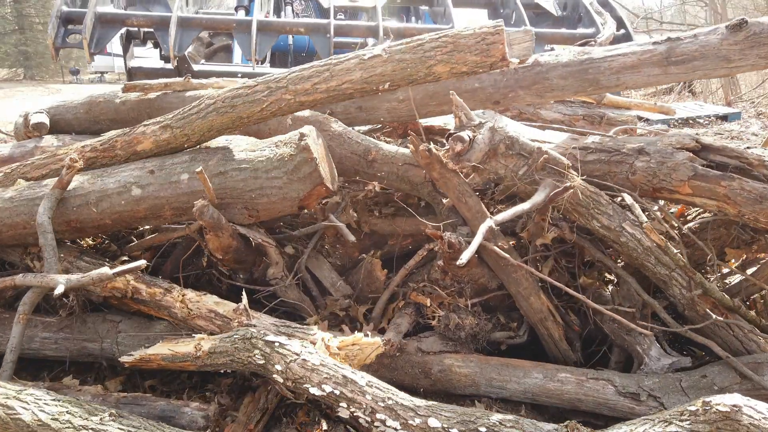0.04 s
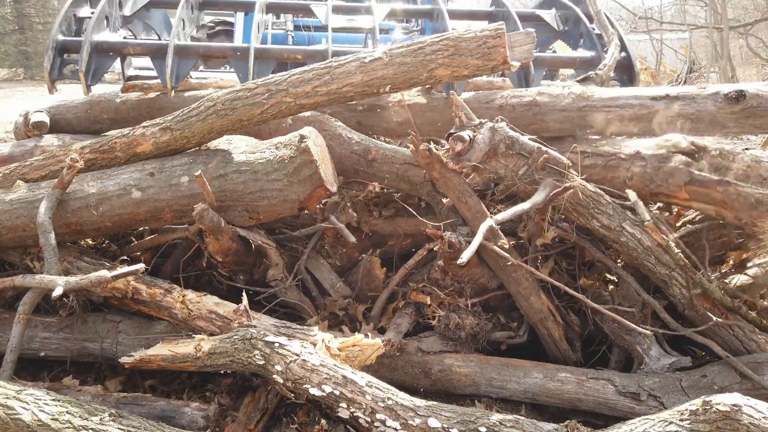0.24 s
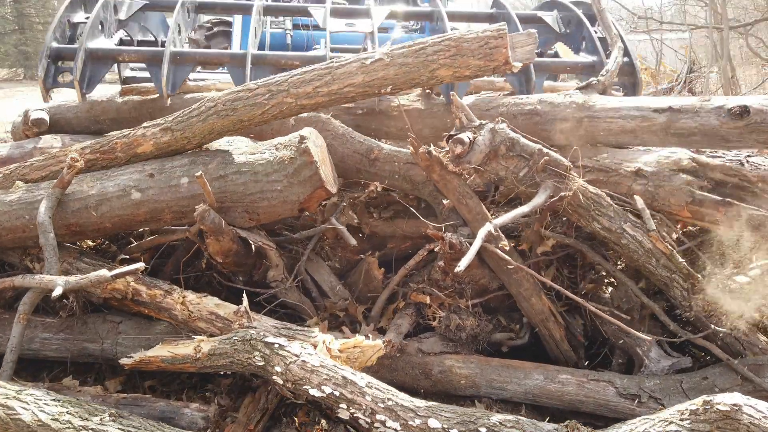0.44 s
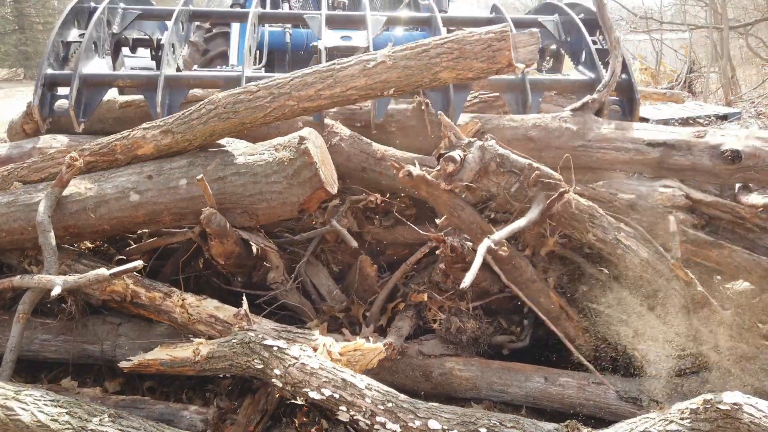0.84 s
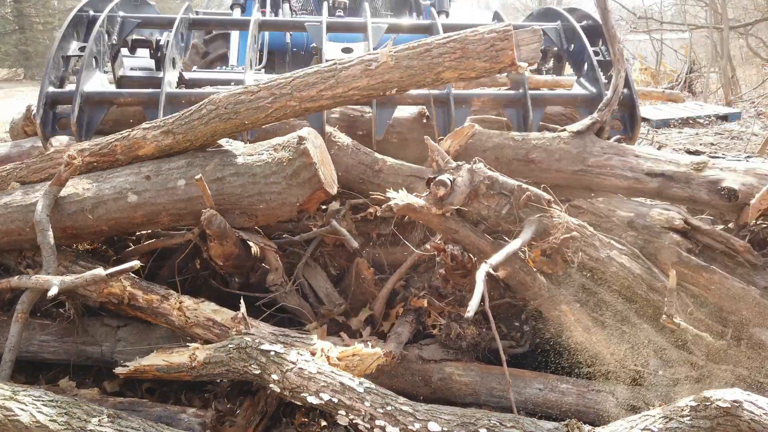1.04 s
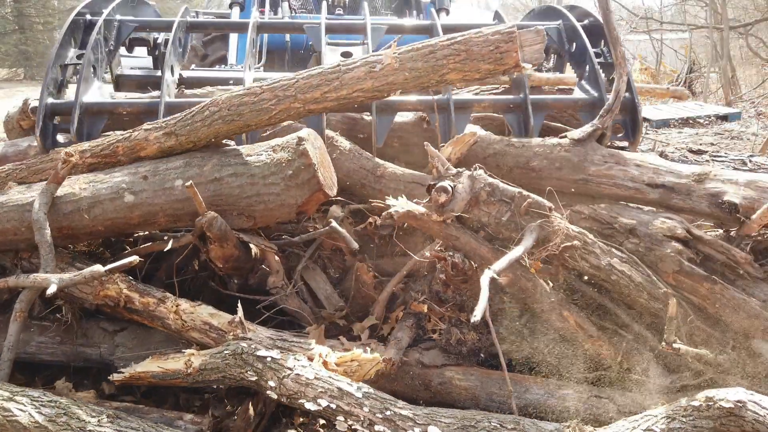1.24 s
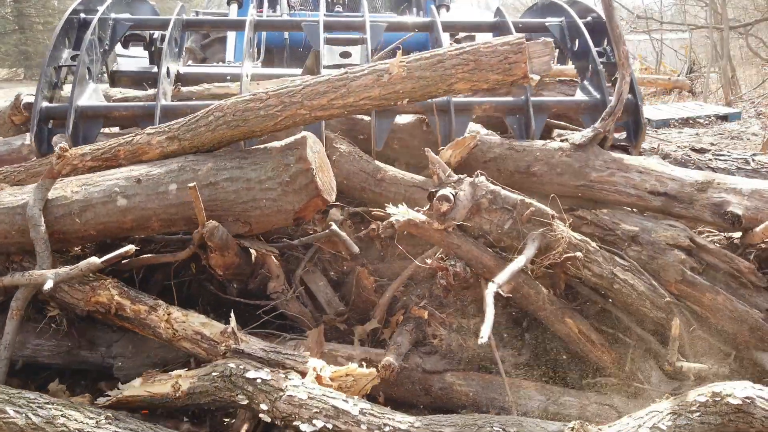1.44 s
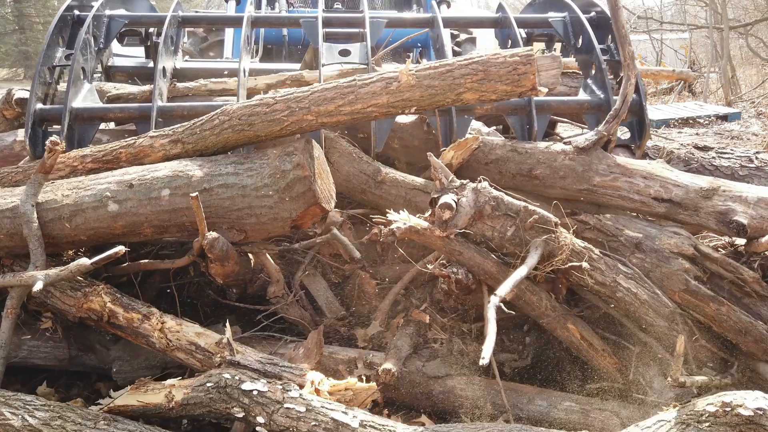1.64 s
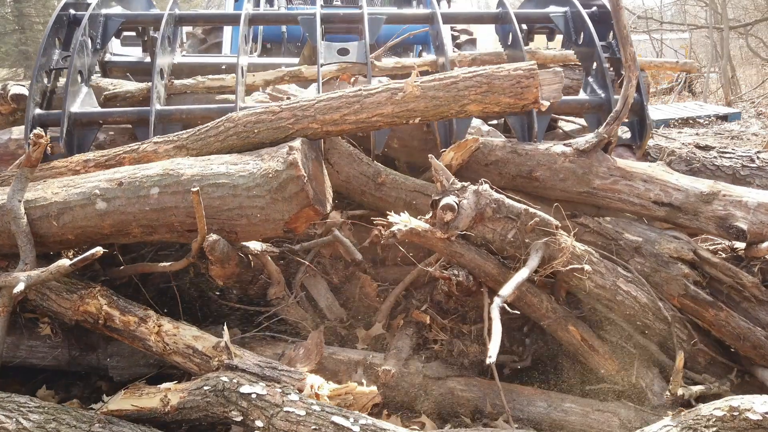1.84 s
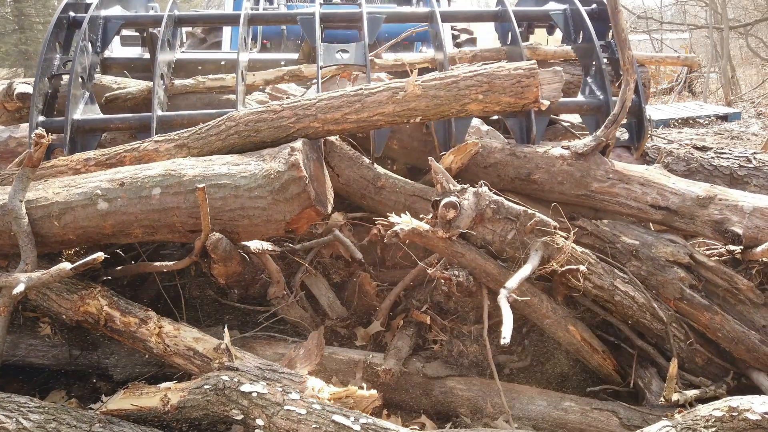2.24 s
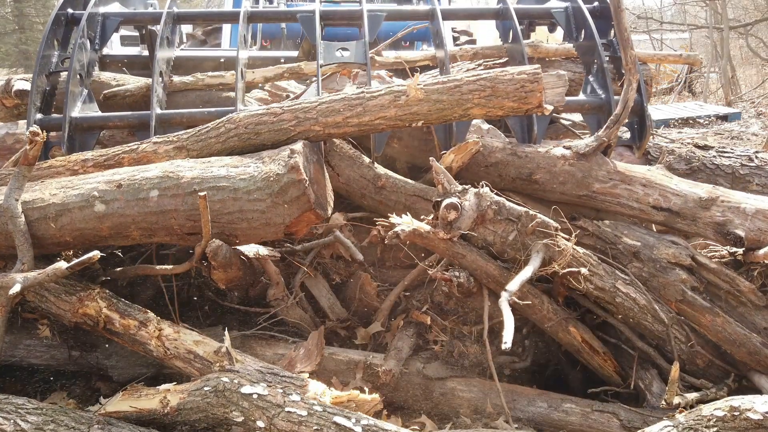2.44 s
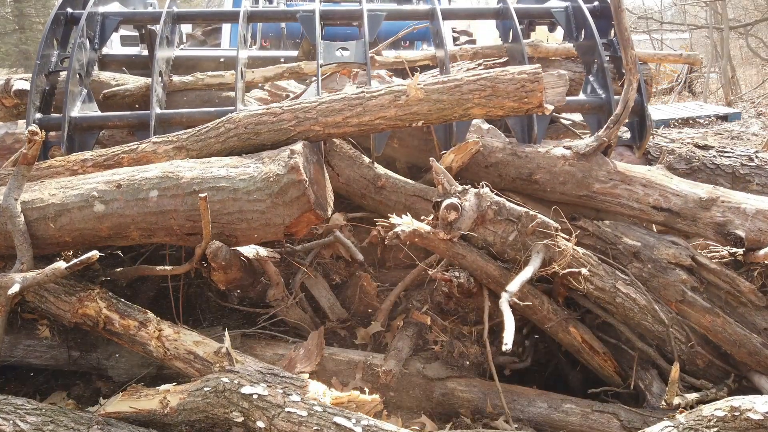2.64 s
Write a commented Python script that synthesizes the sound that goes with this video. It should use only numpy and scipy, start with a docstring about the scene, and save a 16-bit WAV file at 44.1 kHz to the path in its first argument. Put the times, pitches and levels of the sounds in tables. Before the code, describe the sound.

Dry logs and branches crack and snap as a pile is shoved, over an idling diesel engine.

```python
"""In the woods, a loader's steel grapple shoves a pile of dry logs while its diesel engine idles behind.
Fracture releases stored elastic energy: limbs crack and twigs snap in bursts of noise. Impact excites
damped modes: logs thud and one piece rings. Bark and dirt trickle down the pile in many tiny collisions.
The trees scatter a faint echo, and the loudest cracks overload the microphone."""
import sys
import numpy as np
from scipy import signal
from scipy.fft import rfft, irfft, next_fast_len
from scipy.io import wavfile
from scipy.ndimage import map_coordinates

SR = 44100
rng = np.random.default_rng(int(sys.argv[2]) if len(sys.argv) > 2 else 0)


def materialize(psi):
    """Save the field psi as 16-bit PCM at rate SR to the path in sys.argv[1].

    A 1-D psi becomes a single channel; in a 2-D psi each row is a channel.
    """
    bounded = np.clip(np.atleast_2d(psi).T, -1, 1)
    quanta = np.round(bounded * 32767).astype(np.int16)
    wavfile.write(sys.argv[1], SR, quanta)


N = 123479

# decay of the echo (frequency [Hz], t60 [s])
ECHO_DECAY = [(200, 0.14), (2000, 0.082)]
# stereo width (frequency [Hz], side gain [dB])
SIDE_GAIN = [(100, -49), (500, -15.5), (2800, -16), (8000, -1.5)]
# engine spectra (frequency [Hz], gain [dB])
EXHAUST_SPECTRUM = [(10, -28.5), (26, 2), (53, -2), (79, -10), (106, -5.5), (132, -9.5), (165, -29),
                    (225, -34.5), (300, -11), (380, -34), (1500, -95)]
MACHINE_SPECTRUM = [(30, -10), (110, 2), (200, -14), (300, -7), (385, -18.5), (470, -16), (1200, -13),
                    (2800, -20.5), (4800, -50), (13000, -47)]
# sliding debris (time [s], bark level [dB], dirt level [dB])
SLIDE_LEVELS = [(0, -41.5, -44), (.19, -43, -53), (.33, -31, -33), (.5, -37, -50), (.66, -43, -43),
                (.97, -36.5, -43), (1.16, -37.5, -36.5), (1.24, -47.5, -46), (1.5, -40.5, -44.5),
                (1.78, -39.5, -41), (1.87, -42.5, -45), (2.08, -37, -41.5), (2.19, -40, -46),
                (2.25, -48.5, -59), (2.32, -42, -44.5), (2.53, -41.5, -50.5), (2.8, -52.5, -54.5)]
# spectra of falling material (frequency [Hz], gain [dB])
BARK_SPECTRUM = [(100, -13), (400, 3), (1500, 2), (2600, 1), (4500, -7), (9000, -28.5), (16000, -49)]
DIRT_SPECTRUM = [(1500, -6), (4800, 0.5), (12000, 0.5), (16000, -7.5)]
PILE_SPECTRUM = [(80, -3.5), (1000, 2.5), (3000, -12.5), (8000, -20)]
# logs landing on each other (time [s], level [dB], pitch [Hz], t60 [s])
LOG_THUDS = [(0.319, -12, 216, 0.047), (0.402, -15.5, 159.4, 0.15), (0.4259, -12, 166, 0.072),
             (1.098, -23, 203, 0.052), (1.813, -6, 178, 0.025)]
# fracture spectra (frequency [Hz], gain [dB])
SNAP_SPECTRUM = [(250, -18.5), (650, -8.5), (1500, -4), (2500, 0.5), (3300, -4.5), (4500, -11), (7000, -25),
                 (16000, -46)]
SPLINTER_SPECTRUM = [(500, -54), (2500, -12.5), (4500, 1), (6500, 3), (9000, -1), (12000, 1), (16000, -18)]
# bark chips breaking off (time [s], level [dB])
BARK_CHIPS = [(.029, -36.5), (.741, -38), (.951, -37), (1.684, -35.5), (1.913, -34.5), (1.960, -34),
              (2.024, -33.5), (2.191, -29.5), (2.2835, -24), (2.3565, -35.5), (2.634, -40)]
# snapping twigs (time [s], pitch [Hz], snap [dB], splinter [dB], t60 [s])
TWIG_SNAPS = [(.467, 2760, -37, -28.5, 0.011), (.488, 1610, -31, -38.5, 0.028),
              (1.336, 2760, -34, -35.5, 0.028), (1.400, 6200, -33.5, -32, .013),
              (1.488, 2630, -32, -33.5, 0.11), (1.538, 3700, -30, -39, 0.054), (1.651, 2620, -36, -49, .02),
              (1.743, 2050, -27, -49, 0.022), (1.937, 2630, -28.5, -37, 0.034),
              (2.041, 2900, -34.5, -30, 0.013), (2.066, 2800, -30.5, -32.5, .04),
              (2.314, 2370, -31.5, -41, 0.028), (2.373, 1280, -34.5, -32.5, 0.018),
              (2.412, 2950, -37.5, -38.5, 0.023)]
# modes of a limb or twig (ratio to pitch [-], level [dB])
STICK_MODES = [(0.799, -5), (1, 0), (1.202, -5.5)]
# modes of the ringing piece (frequency [Hz], level [dB], t60 [s])
PIECE_MODES = [(1107, 1, 0.067), (1179, -7, 0.21), (1826, -4, 0.24), (2800, -11.5, 0.37), (3090, 1, .11),
               (3950, 9.5, 0.016), (6030, -13, 0.17)]
# breaking limbs (time [s], pitch [Hz], knock [dB], snap [dB], splinter [dB], t60 [s])
LIMB_CRACKS = [(.233, 1370, -33.5, -23.5, -27, 0.019), (.246, 1390, -30, -26, -31, 0.026),
               (.273, 1090, -38, -29.5, -25, 0.015), (.291, 820, -25, -24.5, -29, 0.016),
               (.2995, 653, -26.5, -17.5, -25.5, .014), (.320, 458, -14.5, -21, -24.5, 0.03),
               (0.3204, 823, -13.5, -26.5, -21, 0.13), (.3435, 1080, -20, -24, -32, 0.028),
               (.407, 540, -26, -25.5, -28.5, 0.027), (0.555, 950, -31.5, -33, -39, 0.058),
               (.819, 1022, -13, -16, -32, 0.022), (.980, 974, -19, -18, -28.5, 0.034),
               (1.000, 874, -32, -26, -32, 0.027), (1.067, 905, -13.5, -13.5, -25, 0.021),
               (1.091, 1160, -21.5, -21, -29.5, 0.033), (1.8127, 2636, -16, -19.5, -27, 0.013),
               (2.283, 1090, -24.5, -24, -28.5, 0.042), (2.510, 852, -30, -29, -35.5, .024)]

ECHO_DB, TOP_HZ = -6.5, 16100
FIRING_HZ, EXHAUST_DB, MACHINE_DB = 26.64, -35, -41
COLLAPSE_S, COLLAPSE_DB, COLLAPSE_RISE_S, COLLAPSE_T60 = 0.299, -22, 0.0075, 0.64
BURST_S = 0.0088  # a burst has the energy of this span at rms 1
RISE_SHARE = 0.032  # rise time over t60: short events start sharply, long ones build up


def amp(db):
    """Amplitude ratio of a level in decibels."""
    return 10 ** (np.asarray(db) / 20)


def unit(x):
    """Normalisation to rms 1."""
    return x / np.sqrt(np.mean(x ** 2) + 1e-20)


def along(points, hz):
    """Interpolation of (frequency [Hz], value) points on a log frequency axis."""
    freqs, values = np.transpose(points)
    return np.interp(np.log(hz + 1), np.log(freqs + 1), values)


def curves(rows):
    """Linear interpolation of each column after the time, one value per sample."""
    times, *columns = np.transpose(rows)
    return [np.interp(np.arange(N) / SR, times, column) for column in columns]


def wobble(rate):
    """Smooth random modulation: a spline through rate knots a second."""
    knots = rng.standard_normal(int(N * rate / SR) + 4)
    return map_coordinates(knots, [np.arange(N) * rate / SR])


def colour(x, spectrum):
    """Minimum-phase filtering: folding the cepstrum makes the response causal."""
    n = x.shape[-1]
    m = 2 * next_fast_len(n)
    gain = amp(along(spectrum, np.fft.rfftfreq(m, 1 / SR)))
    cepstrum = irfft(np.log(gain), m)
    cepstrum[1:m // 2] *= 2
    cepstrum[m // 2 + 1:] = 0
    return irfft(rfft(x, m) * np.exp(rfft(cepstrum)), m)[..., :n]


def stereo(pair, spectrum):
    """Mid-side mixing of two uncorrelated signals: coloured, rms 1, wide only in the treble."""
    mid, side = colour(pair, spectrum)
    side = colour(side, SIDE_GAIN)
    return unit(np.array([mid + side, mid - side]))


def add(out, s, x):
    """Superposition of x on out at time s."""
    part = out[:, max(0, round(s * SR)):][:, :x.shape[-1]]
    part += x[..., :part.shape[1]]


def ring(modes, rise_s, rough=0.01):
    """Free vibration: damped modes whose phases wander as the wood rubs."""
    t = np.arange(SR // 4) / SR
    x = np.zeros(len(t))
    for hz, db, t60 in modes:
        wander = rng.random() + rough / 2 * np.cumsum(rng.standard_normal(len(t)))
        x += amp(db - 60 * t / t60) * np.sin(2 * np.pi * (hz * t + wander))
    return (1 - np.exp(-t / rise_s)) * x


def grains(spectrum, rate, spread_db, bed, tick_s=0.00045):
    """Shot noise: rate tiny impacts a second, of scattered size, on a bed of rustle."""
    hits = (rng.random(N) < rate / SR) * amp(spread_db * np.minimum(rng.exponential(size=N), 2))
    decays = signal.lfilter([1], [1, -np.exp(-1 / (tick_s * SR))], hits)
    ticks = decays * rng.standard_normal((2, N))
    return stereo(unit(ticks) + bed * rng.standard_normal((2, N)), spectrum)


def tree_echo(x):
    """Scattering from pile and trees gives a short diffuse echo whose treble dies first."""
    hz, t, noise = signal.stft(rng.standard_normal((2, SR // 2)), SR, nperseg=256)
    decay = amp(-60 * t / along(ECHO_DECAY, hz)[:, None])
    tail = signal.istft(noise * decay, SR, nperseg=256)[1]
    tail = stereo(tail, [(1000, 0)])  # flat spectrum
    return signal.fftconvolve(x, tail / np.linalg.norm(tail[0]), axes=1)[:, :N]


def engine(scatter_db=1.2, clatter_depth=0.24):
    """Periodic firing drives a train of exhaust puffs and modulates the mechanical noise."""
    cycles = .05 + FIRING_HZ * np.arange(N) / SR + .02 * wobble(12)
    firings = np.diff(np.floor(np.abs(cycles)), prepend=-1)
    puffs = firings * amp(scatter_db * rng.standard_normal(N))
    exhaust = unit(colour(puffs - puffs.mean(), EXHAUST_SPECTRUM))
    clatter = 1 + clatter_depth * np.cos(2 * np.pi * cycles)
    machine = stereo(rng.standard_normal((2, N)), MACHINE_SPECTRUM) * clatter
    return amp(MACHINE_DB) * machine - amp(EXHAUST_DB) * exhaust


def debris():
    """Granular flow: bark crackles and dirt trickles as the pile slides."""
    bark_db, dirt_db = curves(SLIDE_LEVELS)
    bark = amp(bark_db + 2.83 * wobble(39.97)) * grains(BARK_SPECTRUM, rate=380, spread_db=3, bed=1.1)
    dirt = amp(dirt_db + 1.8 * wobble(70)) * grains(DIRT_SPECTRUM, rate=700, spread_db=5, bed=1.6)
    return bark + dirt


def collapse():
    """Dense collisions merge into one decaying burst as the pile gives way."""
    t = np.arange(N) / SR - COLLAPSE_S
    rise = np.exp(np.minimum(t, 0) / COLLAPSE_RISE_S)
    decay = amp(COLLAPSE_DB - 60 * np.maximum(t, 0) / COLLAPSE_T60)
    return rise * decay * grains(PILE_SPECTRUM, rate=840, spread_db=2, bed=0.42)


def logs():
    """Impact excites two low, strongly damped modes of each heavy log."""
    out = np.zeros((2, N))
    for s, db, hz, t60 in LOG_THUDS:
        modes = [(hz, 0, t60), (hz * 1.54, -10, t60 / 2)]
        add(out, s, amp(db) * ring(modes, rise_s=RISE_SHARE * t60, rough=0))
    return out


def tear(spectrum, t60, ragged=0.45):
    """Acoustic emission: fibres part in a quick, uneven volley that dies away."""
    t = np.arange(SR // 4) / SR
    sizes = np.exp(ragged * np.repeat(rng.standard_normal(len(t)), 8)[:len(t)])
    envelope = (1 - np.exp(-t / (RISE_SHARE * t60))) * amp(-60 * t / t60)
    volley = rng.standard_normal((2, len(t))) * sizes * envelope
    return stereo(volley, spectrum) * np.sqrt(BURST_S / t[-1])


def knock(hz, t60_cycles=17.5):
    """Hollow resonance of a stick, too thin to radiate far below its pitch."""
    modes = [(hz * ratio, db, t60_cycles / hz) for ratio, db in STICK_MODES]
    highpass = signal.butter(2, hz / 2, "highpass", fs=SR, output="sos")
    x = signal.sosfilt(highpass, ring(modes, rise_s=0.0012))
    return x * np.sqrt(BURST_S * SR) / np.linalg.norm(x)


def chips(t60=0.0052, snap_db=-5.5):
    """Brittle fracture of bark: one sharp tick per chip."""
    out = np.zeros((2, N))
    for s, db in BARK_CHIPS:
        tick = tear(SPLINTER_SPECTRUM, t60) + amp(snap_db) * tear(SNAP_SPECTRUM, t60)
        add(out, s, amp(db) * tick)
    return out


def twigs(note_db=-2):
    """Fracture of thin wood gives a dry snap and excites a high resonance."""
    out = np.zeros((2, N))
    for s, hz, snap_db, splinter_db, t60 in TWIG_SNAPS:
        snap = amp(note_db) * knock(hz) + tear(SNAP_SPECTRUM, t60)
        add(out, s, amp(snap_db) * snap + amp(splinter_db) * tear(SPLINTER_SPECTRUM, t60))
    return out


def ringing_piece(start_s=2.283, db=-20.5):
    """Light damping lets one struck piece ring on; its rattle modulates the amplitude."""
    out = np.zeros((2, N))
    ringing = ring(PIECE_MODES, rise_s=0.0013, rough=0.014)
    rattle = 1 + .4 * wobble(rate=400)[:len(ringing)]
    add(out, start_s, amp(db) * ringing * rattle)
    return out


def limbs(strain_db=-24, strain_t60=0.021):
    """Fracture under load: fibres strain, then the limb snaps, splinters and resonates."""
    out = np.zeros((2, N))
    for s, hz, knock_db, snap_db, splinter_db, t60 in LIMB_CRACKS:
        strain = tear(SNAP_SPECTRUM, strain_t60)[:, :SR // 20][:, ::-1]  # reversed: swells to the break
        add(out, s - strain.shape[1] / SR, amp(snap_db + strain_db) * strain)
        add(out, s, amp(knock_db) * knock(hz))
        add(out, s, amp(snap_db) * tear(SNAP_SPECTRUM, t60))
        add(out, s, amp(splinter_db) * tear(SPLINTER_SPECTRUM, t60))
    return out


def scene():
    """Superposition of breaking wood, its echo, debris and engine."""
    wood = limbs() + ringing_piece() + twigs() + chips() + logs() + collapse()
    return wood + amp(ECHO_DB) * tree_echo(wood) + debris() + engine()


def record(dry):
    """Saturation and band limiting: the microphone clips at full scale and passes nothing above TOP_HZ."""
    m = next_fast_len(N + SR // 2)
    passband = np.fft.rfftfreq(m, 1 / SR) < TOP_HZ
    return irfft(rfft(np.clip(dry, -1, 1), m) * passband, m)[:, :N]


dry = scene()
out = record(dry)
materialize(out)
```